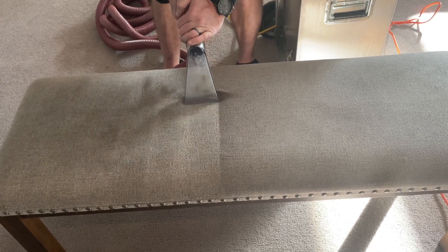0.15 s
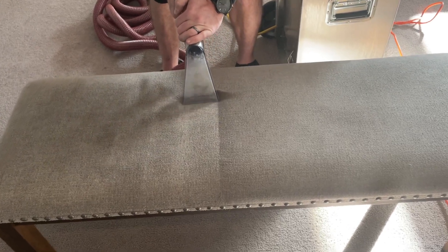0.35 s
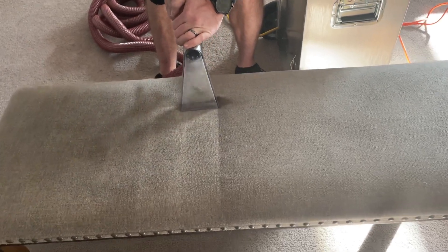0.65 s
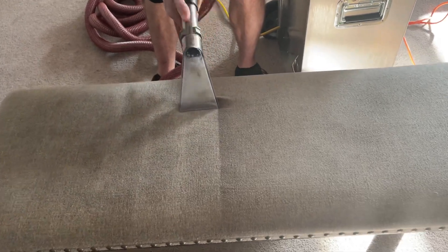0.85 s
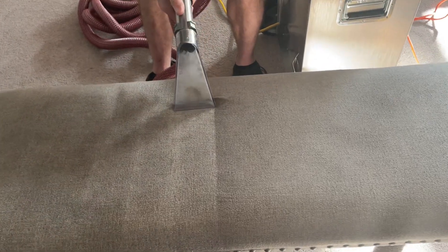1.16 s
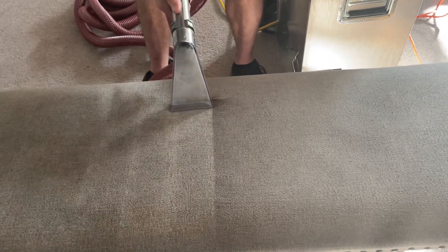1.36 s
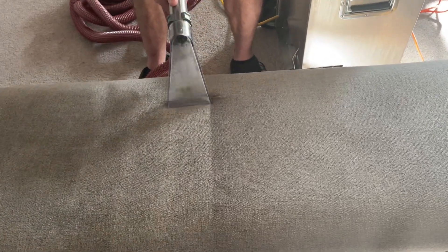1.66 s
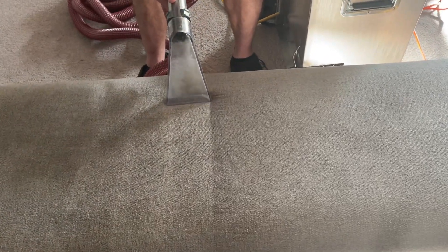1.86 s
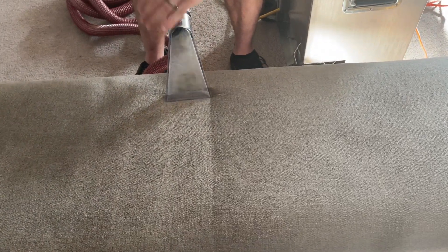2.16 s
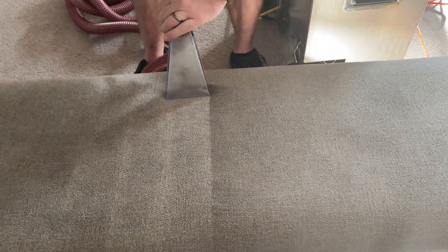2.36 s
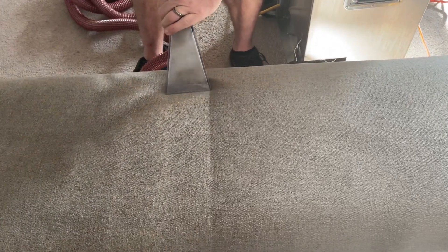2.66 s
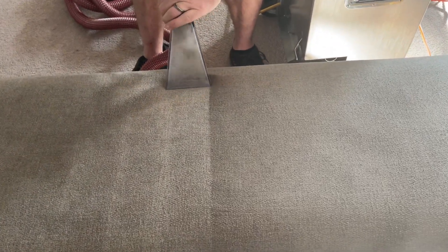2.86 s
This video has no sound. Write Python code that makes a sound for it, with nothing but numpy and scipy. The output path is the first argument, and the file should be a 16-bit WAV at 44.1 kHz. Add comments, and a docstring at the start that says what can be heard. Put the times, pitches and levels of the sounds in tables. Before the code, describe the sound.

Upholstery vacuum extractor roars steadily indoors, motors humming and whining, with thin airy whistles surging later.

```python
"""An upholstery extractor runs indoors while its hand tool is drawn slowly across a cushion.
From the start two vacuum motors at nearly the same speed hum, beat and whine, over a steady low hum.
Air roars in nozzle and hose: filtered noise whose resonances shift mostly between 0.4 and 1.35 s.
The motors' throb deepens until 1.15 s. Two whistles of narrow noise start faint and then surge:
the top one from about 0.6 s, the middle one mostly after 1.2 s. Both go on to the end."""
import sys
import numpy as np
from scipy import signal
from scipy.fft import next_fast_len
from scipy.io import wavfile
from scipy.ndimage import uniform_filter1d

SR = 44100
rng = np.random.default_rng(int(sys.argv[2]) if len(sys.argv) > 2 else 0)


def unload_wav(signal):
    """Save mono or channel-first audio to the path in sys.argv[1] as 16-bit WAV at rate SR, clipped to [-1, 1]."""
    wavfile.write(
        sys.argv[1],
        SR,
        np.round(np.clip(np.atleast_2d(signal).T, -1, 1) * 32767).astype(np.int16),
    )


N = 132741  # length in samples, about 3 s


def amp(db):
    """Turns decibels into a gain."""
    return 10 ** (np.asarray(db) / 20)


def unit(x):
    """Scales a signal to an average strength (rms) of 1."""
    return x / np.sqrt(np.mean(abs(x) ** 2) + 1e-20)


def over_time(points, t):
    """Reads a control curve at the times t, with straight lines between its points."""
    return np.interp(t, *np.transpose(points))


def over_pitch(points, hz):
    """Reads every column of a table at the pitches hz, on a log-frequency axis."""
    f, *columns = np.transpose(points)
    return [np.interp(np.log(hz + 1), np.log(f + 1), c) for c in columns]


def complex_noise(shape):
    """Complex Gaussian noise of power 1; its two parts are independent."""
    return unit(rng.standard_normal(shape) + 1j * rng.standard_normal(shape))


def drift(rate_hz):
    """Slow random wandering in strength and phase, mostly below the given rate."""
    hz = np.fft.fftfreq(next_fast_len(N), 1 / SR)
    spectrum = complex_noise(len(hz)) / (1 + (hz / rate_hz) ** 2)
    return unit(np.fft.ifft(spectrum)[:N])


def partly_alike(left, other, likeness):
    """Mixes a right-hand noise that shares the given part (0 to 1) of the left-hand one."""
    return likeness * left + np.sqrt(1 - likeness ** 2) * other


def place(left, right, balance_db, lead):
    """Gives a pair of complex signals a level difference [dB] and a phase lead of the left [rad]."""
    return np.array([left * amp(balance_db / 2) * np.exp(.5j * lead),
                     right * amp(-balance_db / 2) * np.exp(-.5j * lead)])


def resonance(hz, centre, width, db):
    """Power of a steep-sided resonance, half as strong at the edges of its width."""
    offset = 2 * (hz - centre) / width
    return amp(db) ** 2 / (1 + (np.sqrt(2) - 1) * offset ** 2) ** 2


# How far the tool has been drawn back: (time [s], progress [0 to 1])
STROKE_CURVE = [(0, 0.0057), (.4, 0), (.8, 0.22), (1.35, 0.88), (2.2, 1), (3.01, 1)]


def stroke_progress(t):
    """Position in the stroke, which moves the air resonances and the whistles."""
    return over_time(STROKE_CURVE, t)


BLADES = 12  # the partial at this multiple of the shaft speed is the fan-blade whine
BEAT_HZ, IN_STEP_S = 3.85, 1.02  # how much faster motor two turns; time when both are in step
FLUTTER_HZ = 13
# Shaft speed of the first motor: (time [s], speed [turns per second])
SHAFT_SPEED = [(0, 312.3), (.7, 312.55), (1.65, 311.95), (3.01, 311.75)]
# Motor partials, levels before the two curves below: (multiple of shaft speed, first motor [dB],
# second motor [dB], left over right [dB], left lead [rad], flutter [0 to 1])
MOTOR_PARTIALS = [(1, -31, -35.3, 4.5, .35, .08), (2, -51, -52, -2, .2, .6), (6, -43, -56, -2, .2, .6),
                  (12, -38.2, -46, 4.5, -1.6, .38), (22, -56, -70, 2, -1.6, .6),
                  (24, -47.5, -60, 0, -2.4, .5), (36, -57.5, -72, 0, 0, .5)]
# Change of the fan-blade whine, which swells and sinks: (time [s], level [dB])
WHINE_LEVEL = [(0, 5), (.35, 3), (.48, -4), (.61, 5.5), (.69, 2.5), (.78, 5.3), (.87, 6.8), (.98, -2.5),
               (1.24, -2.5), (1.31, 1.5), (1.45, -3), (1.6, -1.5), (1.87, 5.3), (2.28, 2.7), (2.45, -1.5),
               (2.57, -.5), (2.65, -7), (2.75, -2), (3.01, -3.5)]
# Change of the second motor, which deepens the throb: (time [s], level [dB])
SECOND_MOTOR_LEVEL = [(0, -3), (.7, -2), (1.15, .5), (3.01, .5)]


def motors():
    """Two shafts beat because their speeds differ; turbulence makes their partials flutter."""
    t = np.arange(N) / SR
    first_turns = np.cumsum(over_time(SHAFT_SPEED, t)) / SR
    second_turns = first_turns + BEAT_HZ * (t - IN_STEP_S)
    second_change_db = over_time(SECOND_MOTOR_LEVEL, t)
    out = np.zeros((2, N))
    for order, first_db, second_db, balance_db, lead, flutter in MOTOR_PARTIALS:
        swell_db = over_time(WHINE_LEVEL, t) if order == BLADES else 0
        steady = np.sqrt(1 - flutter ** 2)
        for turns, db in ((first_turns, first_db), (second_turns, second_db + second_change_db)):
            tone = np.sqrt(2) * amp(db + swell_db) * np.exp(2j * np.pi * order * turns)
            left = tone * (steady + flutter * drift(FLUTTER_HZ))
            right = tone * (steady + flutter * drift(FLUTTER_HZ))
            out += place(left, right, balance_db, lead).real
    return out


# Steady tones of the pump and mains: (pitch [Hz], level [dB], left over right [dB])
HUM_TONES = [(60.2, -47.5, -4), (120.3, -43.5, -3.5), (404.5, -50.5, 7)]


def hum():
    """Steady pure tones of the pump and mains, heard from the machine's cabinet."""
    t = np.arange(N) / SR
    out = np.zeros((2, N))
    for hz, db, balance_db in HUM_TONES:
        tone = np.sqrt(2) * amp(db) * np.exp(2j * np.pi * (hz * t + rng.random()))
        out += place(tone, tone, balance_db, 0).real
    return out


HISS_HZ, RUMBLE_HZ = 3430, 195  # hiss curve acts mostly above, rumble curve mostly below
PATCH_DB, SWELL_DB, RIPPLE_DB = 1.6, .3, .7  # random changes: in time and pitch, in time, in pitch
# Broad rush of air, before the changes below: (pitch [Hz], level [dB per Hz])
AIR_RUSH = [(22, -94), (50, -80), (85, -74), (105, -62), (145, -56.5), (185, -60), (225, -64), (290, -58.5),
            (355, -65.5), (460, -57), (665, -64), (760, -59), (1100, -61), (1450, -65), (1750, -66.5),
            (2300, -67.5), (2800, -67.3), (3300, -68.7), (4250, -75.5), (5400, -71.5), (6100, -73.5),
            (6700, -72), (8200, -73), (9200, -75.5), (11200, -77.5), (13000, -86), (14300, -83),
            (15700, -87)]
# Fixed resonances of the metal tube: (pitch [Hz], width [Hz], level [dB per Hz])
TUBE_RESONANCES = [(2500, 150, -64), (3050, 170, -64.5), (3600, 220, -64.5), (4030, 110, -66),
                   (4410, 130, -64.5), (4770, 190, -67), (5260, 200, -71)]
# Air resonances of nozzle and hose that move with the stroke:
# (start pitch [Hz], end pitch [Hz], width [Hz], start level [dB per Hz], end level [dB per Hz])
NOZZLE_RESONANCES = [(760, 728, 40, -54, -56.5), (835, 820, 30, -53, -55), (1170, 1160, 75, -53, -61),
                     (1258, 1241, 24, -52, -55.5), (1380, 1348, 42, -57, -52.5), (1940, 1825, 36, -57, -55),
                     (2145, 2100, 50, -56, -56), (2370, 2330, 70, -59, -72)]
# Change of the hiss: (time [s], level [dB])
HISS_LEVEL = [(0, -.9), (.5, -.5), (1, 0), (1.6, .8), (2.1, .3), (2.6, -.1), (3.01, -.1)]
# Change of the machine's low rumble: (time [s], level [dB])
RUMBLE_LEVEL = [(0, 0.5), (.8, -2.5), (1.4, -3), (2.2, 0), (2.7, -0.5), (3.01, -1)]
# Stereo image of the air noise, left against right at each pitch:
# (pitch [Hz], likeness [0 to 1], left lead [rad], left over right [dB])
AIR_STEREO_IMAGE = [(60, .99, 0, -3), (170, .98, .1, -1.5), (280, .96, .3, 4), (390, .7, .3, 2),
                    (470, .15, 2.5, 5), (560, .38, .8, -4), (730, .65, 0, 0), (930, .95, -.4, -3),
                    (1170, .85, 0, -1.5), (1450, .6, -.7, -2), (1580, .88, -.5, -2.3), (2000, .55, -.2, -1),
                    (2400, .78, .1, 0), (3200, .6, .3, 2.5), (3800, .5, -.5, 3), (4600, .62, -.3, 1),
                    (5700, .58, 0, 2), (6700, .6, -.8, 1), (7500, .7, -2.6, 0), (8300, .92, -3.14, 0),
                    (9200, .72, -3.9, 0), (10200, .72, -5.2, 0), (11700, .92, -6.28, 0),
                    (12900, .7, -6.9, 0), (13500, .6, -8.7, 0), (14200, .98, -9.4, 0)]


def suction(size=2048):
    """Turbulent air: a broad rush plus the resonances of nozzle and tube, rippled by the room."""
    hop = size // 4
    t = (np.arange(N // hop + 3) * hop / SR)[:, None]
    hz = np.fft.rfftfreq(size, 1 / SR)
    shape = (len(t), len(hz))
    stroke = stroke_progress(t)

    power = amp(over_pitch(AIR_RUSH, hz)[0]) ** 2
    power = power + sum(resonance(hz, *row) for row in TUBE_RESONANCES)
    for hz0, hz1, width, db0, db1 in NOZZLE_RESONANCES:
        power = power + resonance(hz, hz0 + (hz1 - hz0) * stroke, width, db0 + (db1 - db0) * stroke)

    # Random changes, smoothed over neighbouring moments (axis 0) and pitches (axis 1)
    patches = uniform_filter1d(rng.standard_normal(shape), size=8, axis=0)
    patches = unit(uniform_filter1d(patches, size=14, axis=1))
    swell = unit(uniform_filter1d(rng.standard_normal(t.shape), size=5, axis=0))
    ripple = rng.standard_normal((2, 1, len(hz))) * hz / (hz + 900)
    hiss_db = over_time(HISS_LEVEL, t) * hz ** 2 / (hz ** 2 + HISS_HZ ** 2)
    rumble_db = over_time(RUMBLE_LEVEL, t) / (1 + (hz / RUMBLE_HZ) ** 2)
    random_db = PATCH_DB * patches + SWELL_DB * swell + RIPPLE_DB * ripple
    gain = np.sqrt(power) * amp(hiss_db + rumble_db + random_db)

    likeness, lead, balance_db = over_pitch(AIR_STEREO_IMAGE, hz)
    left = complex_noise(shape)
    right = partly_alike(left, complex_noise(shape), likeness)
    # The last factor turns levels per Hz into levels of the overlapping short spectra
    spectra = place(left, right, balance_db, lead) * gain * np.sqrt(3 * SR / size)
    return signal.istft(spectra.swapaxes(1, 2), nperseg=size, noverlap=size - hop)[1][:, :N]


HOLD_S = .055  # the steady pull of the motors evens out the air tones over this time
AIR_TONE_LIKENESS = .93  # between left and right, 0 to 1


def air_tone(hz, width):
    """A warbling tone of moving air: narrow noise round the pitch curve hz, its strength held even."""
    rate_hz = width / (2 * np.sqrt(np.sqrt(2) - 1))
    left = drift(rate_hz)
    pair = np.array([left, partly_alike(left, drift(rate_hz), AIR_TONE_LIKENESS)])
    strength = np.sqrt(uniform_filter1d((abs(pair) ** 2).mean(0), size=round(HOLD_S * SR)))
    carrier = np.exp(2j * np.pi * np.cumsum(hz * np.ones(N)) / SR)
    return np.sqrt(2) * pair / strength * carrier


ROAR_DB, ROAR_LEAD = -0.03, -0.47  # added to the roar's level curve [dB]; left lead [rad]
ROAR_START_BALANCE_DB, ROAR_END_BALANCE_DB = -2.5, -3.8  # left over right
# Close resonances of the nozzle's slot, levels relative to each other:
# (start pitch [Hz], end pitch [Hz], width [Hz], start level [dB], end level [dB])
SLOT_RESONANCES = [(885, 895, 40, -9, -4.5), (944, 930, 37, -5, -4.5), (970, 972, 33.4, -4, -4)]
# Roar at the slot, before ROAR_DB: (time [s], level [dB])
ROAR_LEVEL = [(0, -28), (.09, -22.5), (.15, -26), (.21, -21.5), (.3, -25.3), (.5, -23), (.61, -27),
              (.7, -22.5), (.8, -24.5), (.88, -22), (1.09, -20.7), (1.27, -24.3), (1.34, -20.7),
              (1.5, -24.3), (1.74, -21), (1.92, -24.5), (1.99, -20.7), (2.2, -22.7), (2.3, -21),
              (2.68, -23.5), (2.86, -19.5), (2.92, -23), (3.01, -22)]


def slot_roar():
    """Air drawn through the slot roars in a tight band of close resonances."""
    t = np.arange(N) / SR
    stroke = stroke_progress(t)
    roar, total_power = 0, 0
    for hz0, hz1, width, db0, db1 in SLOT_RESONANCES:
        gain = amp(db0 + (db1 - db0) * stroke)
        roar = roar + gain * air_tone(hz0 + (hz1 - hz0) * stroke, width)
        total_power = total_power + gain ** 2
    roar = roar / np.sqrt(total_power)
    balance_db = ROAR_START_BALANCE_DB + (ROAR_END_BALANCE_DB - ROAR_START_BALANCE_DB) * stroke
    return (place(*roar, balance_db, ROAR_LEAD) * amp(ROAR_DB + over_time(ROAR_LEVEL, t))).real


# Middle and top whistle: (start pitch [Hz], end pitch [Hz], width [Hz],
# gain added to the level curve [dB], left over right [dB], left lead [rad])
WHISTLE_PITCHES = [(1588, 1582, 52, 2.3, -2.3, -.5), (2024, 1962, 48, 1.8, -1, -.2)]
# Middle whistle, which grows in surges, before its gain: (time [s], level [dB])
MIDDLE_WHISTLE_LEVEL = [(0, -39), (.6, -40), (.7, -34.5), (.78, -40.5), (.92, -42), (1.29, -31.5),
                        (1.39, -35), (1.48, -29.5), (1.53, -34.5), (1.61, -29), (1.7, -34.5), (1.85, -31),
                        (2.0, -33), (2.07, -28.5), (2.22, -31.5), (2.3, -26.5), (2.38, -31), (2.5, -29),
                        (2.73, -29), (2.82, -34.5), (3.01, -30)]
# Top whistle, which surges and sinks, before its gain: (time [s], level [dB])
TOP_WHISTLE_LEVEL = [(0, -39), (.45, -38), (.66, -32.5), (.86, -28.5), (.96, -39), (1.02, -29), (1.08, -38),
                     (1.2, -29), (1.27, -37), (1.36, -30), (1.52, -31.5), (1.6, -37), (1.69, -29.5),
                     (1.82, -36), (1.95, -31), (2.1, -40), (2.2, -32), (2.55, -30.7), (2.68, -36),
                     (2.82, -29.7), (3.01, -35)]


def whistles():
    """Two thin air tones of the nozzle, above the roar, sink in pitch as the stroke goes on."""
    t = np.arange(N) / SR
    stroke = stroke_progress(t)
    out = np.zeros((2, N))
    for row, level in zip(WHISTLE_PITCHES, (MIDDLE_WHISTLE_LEVEL, TOP_WHISTLE_LEVEL)):
        hz0, hz1, width, gain_db, balance_db, lead = row
        tone = air_tone(hz0 + (hz1 - hz0) * stroke, width)
        out += (place(*tone, balance_db, lead) * amp(gain_db + over_time(level, t))).real
    return out


def scene():
    """Motors, hum, suction, slot roar and whistles together."""
    return motors() + hum() + suction() + slot_roar() + whistles()


CUTOFF_HZ = 15750


def record(dry):
    """The recorder's band limit: a low-pass filter takes away what lies above the cutoff."""
    lowpass = signal.firwin(511, CUTOFF_HZ, window=("kaiser", 9), fs=SR)
    return signal.oaconvolve(dry, lowpass[None], "same")


dry = scene()
out = record(dry)
unload_wav(out)
```